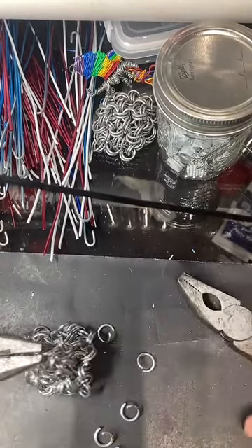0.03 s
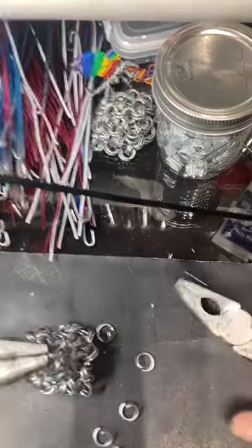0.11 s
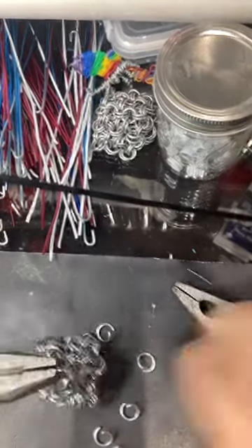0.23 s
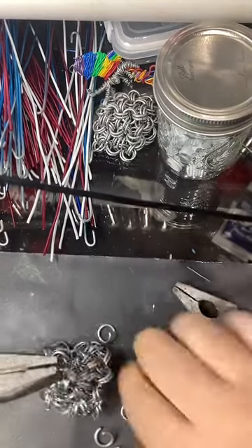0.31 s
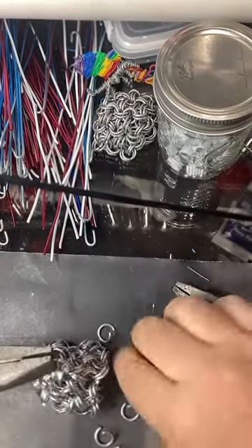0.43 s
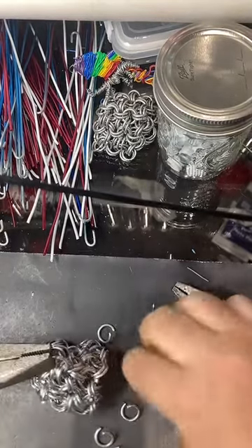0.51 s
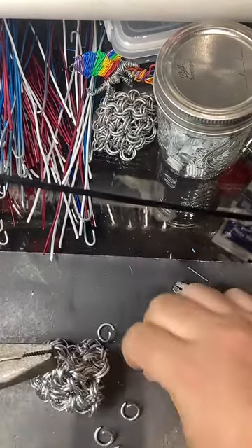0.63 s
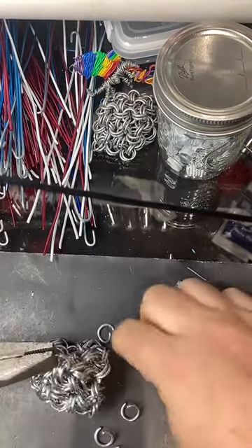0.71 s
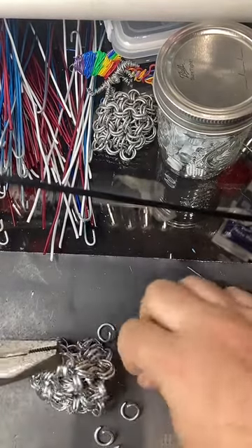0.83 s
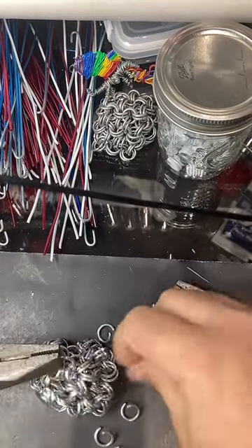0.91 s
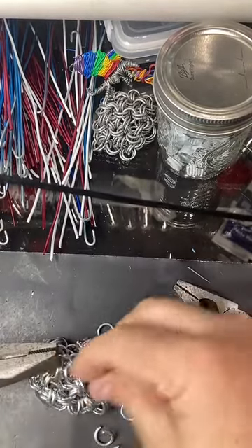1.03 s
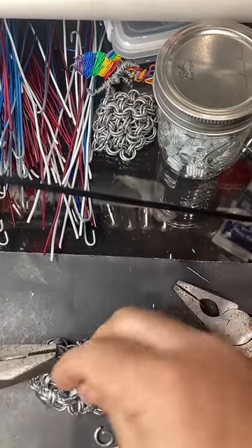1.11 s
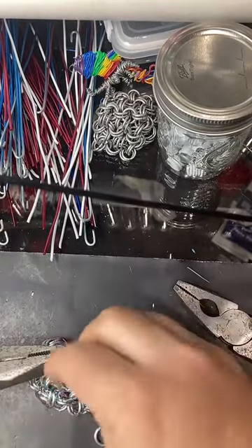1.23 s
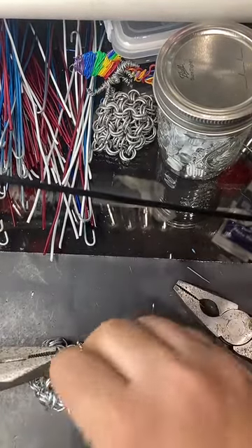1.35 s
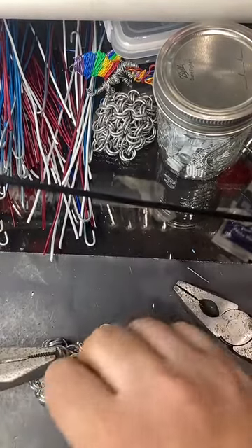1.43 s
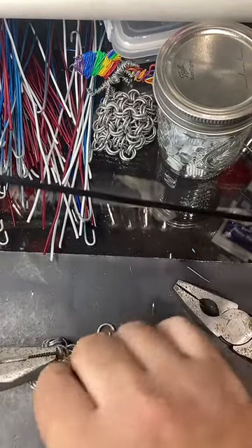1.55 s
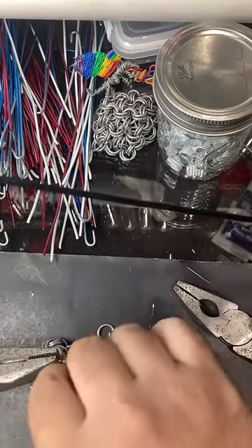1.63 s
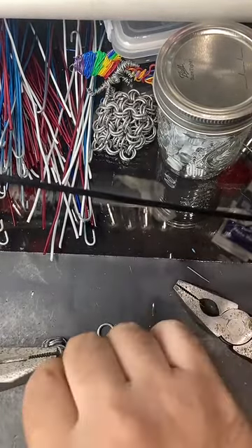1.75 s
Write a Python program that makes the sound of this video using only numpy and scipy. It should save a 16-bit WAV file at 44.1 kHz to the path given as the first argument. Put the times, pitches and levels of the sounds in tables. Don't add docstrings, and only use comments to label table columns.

```python
import sys
import numpy as np
from scipy import signal
from scipy.io import wavfile
from scipy.ndimage import uniform_filter1d

SR = 44100
rng = np.random.default_rng(int(sys.argv[2]) if len(sys.argv) > 2 else 0)


def amplitude_ratio(level_db):
    exponent = np.asarray(level_db, float) / 20
    return 10 ** exponent


def wav_out(sig):
    wavfile.write(sys.argv[1], SR, np.round(np.clip(np.atleast_2d(sig).T, -1, 1) * 32767).astype(np.int16))


N = 79380

# frequency in Hz, t60 in seconds.
ROOM_DECAY = [(60, 0.27), (250, 0.93), (1000, 0.6), (3000, 0.69), (8000, 0.49), (13000, 0.61)]


def evened(x):
    return x / np.sqrt(np.mean(x ** 2) + 1e-20)


def smoothed(x, size_0, size_1):
    return uniform_filter1d(uniform_filter1d(x, size=size_0, axis=0), size=size_1, axis=1)


def read(points, hz):
    f, value = np.transpose(points)
    return np.interp(np.log(hz + 1), np.log(f + 1), value)


def add(mix, s, sound):
    part = mix[round(s * SR):][:len(sound)]
    part += sound[:len(part)]


def colour(x, points):
    gain_db = np.maximum(read(points, abs(np.fft.fftfreq(8192, 1 / SR))), -100)
    log_gain = np.log(amplitude_ratio(gain_db))
    taps = np.fft.ifft(np.exp(np.conj(signal.hilbert(log_gain)))).real[:4096]
    return signal.oaconvolve(x, taps / np.linalg.norm(taps))[:len(x)]


def resonate(x, hz, width_hz):
    turn = np.exp(2j * np.pi * hz * np.arange(len(x)) / SR)
    r = np.exp(-np.pi * width_hz / SR)
    return 2 * (turn * signal.lfilter([1 - r], [1, -r], x / turn)).real


def tail(x, decays):
    hz, t, z = signal.stft(rng.standard_normal(SR), SR, nperseg=256)
    fall_db = -60 * t / read(decays, hz)[:, None]
    h = signal.istft(z * amplitude_ratio(fall_db), SR, nperseg=256)[1]
    h = h * np.minimum(np.arange(len(h)) / SR / 0.0013, 1)
    return signal.fftconvolve(x, h / np.linalg.norm(h))[:N]


def burst(noise, length_ms):
    u = np.arange(len(noise)) / SR * 1000 / length_ms
    return noise * np.minimum(4 * u, 1) * np.exp(-u)


def ring(modes, waver=0., waver_s=.03):
    t = np.arange(SR) / SR
    size = round(waver_s * SR)
    shake = rng.standard_normal((len(modes), SR))
    shake = uniform_filter1d(uniform_filter1d(shake, size=size, axis=1), size=size, axis=1)
    out = np.zeros(SR)
    for (hz, db, t60_s), w in zip(modes, shake):
        out += amplitude_ratio(db - 60 * t / t60_s) * (1 + waver * evened(w)) * np.sin(2 * np.pi * hz * t)
    return out


def knocks():
    # start in seconds, peak in dB, pitch in Hz, length in ms, bright share 0-1.
    contacts = [(0.237, -11.5, 2310, 5.6, 0.42), (0.2414, 5, 8640, 1.3, 0.3), (0.2417, -0.5, 650, 4.6, 0.1),
                (0.2429, -0.5, 294.2, 7, .05), (.2465, -3, 1090, 1.43, 0.2), (.2490, -3, 4700, 2.1, 0.4),
                (.2500, 1, 772, 2.3, 0.3), (0.252, -0.5, 1571, 1.1, 0), (0.256, -10.5, 2300, 0.78, 0.6),
                (0.2576, -6, 4800, 0.87, 0.4), (0.2599, -9.5, 1900, 1.1, 0.6),
                (0.2651, -2.5, 710, 0.83, 0.5), (0.271, -17, 2500, 0.97, 0.6),
                (0.2733, -14, 7900, 1.2, 0.6), (.2770, -4.5, 1720, 1.2, 0.4),
                (.289, -15.5, 9400, 0.67, 0.4), (0.3, -12, 2300, 1.1, 0.7), (0.3085, -16, 297, 4.3, 0.62),
                (0.309, -22, 8000, 0.71, .6), (0.344, -26, 5900, 1.9, 0.5)]
    # frequency in Hz, level in dB.
    dull_spectrum = [(200, -15.5), (600, -4), (1090, -3), (3240, -14.5), (4760, -20), (6390, -24),
                     (9180, -33.5), (12600, -49), (13500, -53)]
    bright_spectrum = [(300, -19.5), (2000, -0.5), (5000, 0), (8500, -2.5), (11000, -7.5), (13000, -8)]
    dull, bright, tone = np.zeros((3, N))
    noises = rng.standard_normal((len(contacts), 2, 1500))
    t = np.arange(1500) / SR
    for (s, db, hz, ms, share), noise in zip(contacts, noises):
        add(dull, s, 0.57 * amplitude_ratio(db) * (1 - share) * burst(noise[0], ms))
        add(bright, s, 0.71 * amplitude_ratio(db) * share * burst(noise[1], ms))
        pitched = np.sin(2 * np.pi * hz * t) * np.exp(-t * 1000 / ms)
        if hz > 2000:
            pitched = pitched * np.minimum(hz * t / 3, 1)
        add(tone, s, 0.26 * amplitude_ratio(db) * pitched / abs(pitched).max())
    return colour(dull, dull_spectrum) + colour(bright, bright_spectrum), amplitude_ratio(4) * tone


def table_and_steel():
    # frequency in Hz, level in dB, t60 in seconds.
    top_modes = [(173.3, -9.5, 0.71), (3112, -3, 0.13), (333.2, -9.5, 0.4), (520.6, -4, 0.32),
                 (483.5, -13.5, 0.29), (801, -3.5, .19), (1084, -2.5, 0.41), (1385, -4, 0.2),
                 (1580, 1, 0.24), (1805, 0, 0.33), (2300, -5, 0.22), (2867, 0, 0.15), (3500, -0.5, 0.25),
                 (4700, -3.5, 0.047)]
    steel_modes = [(258, -14, 2.5), (323, -3, 2.5), (366, -13, 2.5), (942, -14, 2.0), (1227, -11, 2.0),
                   (2089, -15, 2.0), (3230, -19, .8), (3580, -20, .8), (3725, -12, 1.8), (3765, -11, 1.8)]
    steady_top_modes = [(94.5, -13.5, .12), (651.3, -20.5, 0.6)]
    low_modes = [(76, -8, 0.23), (113.2, 0.5, 0.21), (169.7, -3.5, 0.25)]
    blow_s, rebound_s = 0.2417, 0.305
    top_db, steel_db, rebound_db = -24.5, -40, -17.5
    body = np.zeros(N)
    rise = np.minimum(np.arange(SR) / SR / 0.0064, 1)
    blow = amplitude_ratio(top_db) * ring(top_modes, waver=.8, waver_s=.012)
    blow += amplitude_ratio(steel_db) * ring(steel_modes, waver=.35, waver_s=.03)
    blow += ring(steady_top_modes)
    add(body, blow_s, rise * blow)
    add(body, rebound_s, rise * amplitude_ratio(rebound_db) * ring(low_modes))
    return body


def pliers():
    # frequency in Hz, t60 in seconds.
    rattle_decay = [(60, 0.58), (250, 0.2), (1000, 0.1), (3000, 0.12), (8000, 0.14), (13000, 0.13)]
    tone_to_room_db, rattle_db, room_db = -6, -3.5, -16
    noise, tone = knocks()
    highpass = signal.butter(2, 90, "high", fs=SR, output="sos")
    direct = signal.sosfilt(highpass, noise + tone)
    far = direct - (1 - amplitude_ratio(tone_to_room_db)) * tone
    far = colour(far, [(150, -4.5), (700, -5), (3000, 1.0), (9000, -4.5), (12000, -11)])
    scattered = amplitude_ratio(rattle_db) * tail(far, rattle_decay) + amplitude_ratio(room_db) * tail(far, ROOM_DECAY)
    return direct + table_and_steel() + scattered


def ticks():
    # start in seconds, peak in dB, pitch in Hz, length in ms.
    tips = [(0.0809, -30.5, 7550, 2.5), (0.0942, -36, 7800, 3.6), (0.111, -44, 6200, 2.2),
            (0.1185, -27.5, 4150, 0.89), (0.1303, -21, 5600, .7), (0.137, -45, 6400, 1.5),
            (.492, -45, 7000, 0.65), (0.5042, -38, 6500, 0.76), (0.5386, -37.5, 8680, 0.76),
            (0.547, -38.5, 5800, 1.8), (0.5545, -40, 6300, 1.6), (0.5644, -36, 6940, 0.83),
            (0.593, -52, 7600, 6.2), (.6240, -37.5, 7200, 1.8), (0.638, -47, 6500, 1.6),
            (0.7175, -32, 6700, 0.68), (0.729, -47, 6520, 2.8), (0.7505, -38, 6560, 0.56),
            (0.7598, -54, 7400, 2.9), (0.8845, -16.5, 6700, 0.3), (0.883, -32, 2480, 0.82),
            (0.8832, -31.5, 3280, 1.7), (.8841, -27, 9400, .3), (.8950, -36, 7670, 1.74),
            (1.3222, -42.5, 5708, 1.48), (1.5847, -44.5, 4020, 0.95), (1.6677, -50, 7460, .8),
            (1.674, -43, 5400, 0.58), (1.6771, -33, 5030, .8), (1.6744, -35, 8680, 0.52),
            (1.6766, -38.5, 5105, .8), (1.6784, -43, 11800, 0.64), (1.6880, -50.5, 6780, 2.0)]
    # frequency in Hz, level in dB.
    air_spectrum = [(800, -21.5), (2500, -3), (4500, -8), (6600, 3.5), (10500, -6.5), (13500, -12.5)]
    width_hz, tone_db = 420, 4
    wide, tone = np.zeros((2, N))
    for (s, db, hz, ms), noise in zip(tips, rng.standard_normal((len(tips), 1200))):
        u = np.arange(1200) / SR * 1000 / ms
        hit = amplitude_ratio(db) * 0.71 * np.clip(noise, -2, 2) * u * np.exp(-u)
        add(wide, s, hit)
        add(tone, s, 3 * resonate(resonate(hit, hz, width_hz), hz, 2 * width_hz))
    return colour(wide, air_spectrum) + amplitude_ratio(tone_db) * tone


def slips():
    # frequency in Hz, level in dB.
    scrape_spectrum = [(240, 0.5), (400, 6), (2240, -6.5), (2670, -7.5), (2880, -6), (7170, -8),
                       (10800, -10.5), (12500, -9), (13500, -5.5)]
    slips_per_s, spread_db, decay_cycles = 21000, 2.5, 3.2
    size = amplitude_ratio(spread_db * np.minimum(rng.exponential(1, N), 4)) * (rng.random(N) < slips_per_s / SR)
    which = rng.integers(0, 30, N)
    t = np.arange(300) / SR
    out = np.zeros(N)
    for k, hz in enumerate(np.geomspace(1500, 13000, num=30)):
        grain = hz * np.exp(-t * hz / decay_cycles) * np.sin(2 * np.pi * hz * t)
        out += signal.oaconvolve(size * (which == k), grain)[:N]
    return evened(colour(out, scrape_spectrum))


def slide():
    # start in seconds, length in seconds, level in dB, pitch in Hz.
    strokes = [(-.03, .12, -41, 6500), (-.03, 0.13, -60, 12200), (-.03, 0.095, -56.5, 1110),
               (0.063, 0.094, -48, 7700), (0.109, 0.084, -43, 5400), (0.142, 0.36, -52.5, 7760),
               (.33, 0.13, -59, 3600), (0.371, 0.2, -54, 8500), (0.518, 0.1, -57, 7470),
               (0.609, 0.034, -83, 7380), (0.617, 0.044, -56.5, 8340), (0.664, 0.056, -60, 6900),
               (0.728, 0.077, -62.5, 7440), (0.823, 0.14, -53.5, 8810), (.84, .06, -60, 11000),
               (0.878, 0.15, -59.5, 7160), (0.986, 0.15, -55, 6790), (1.024, 0.063, -58, 3170),
               (1.072, 0.08, -62.5, 5000), (1.2, 0.11, -70, 8400), (1.338, 0.071, -68, 10000),
               (1.092, 0.023, -66, 6100), (1.426, 0.12, -66.5, 4870), (1.57, 0.061, -66, 8990),
               (1.689, 0.049, -67.5, 5860)]
    tone_width_hz, tone_db = 380, -14
    grit = slips()
    t = np.arange(N) / SR
    out = np.zeros(N)
    for s, length_s, db, hz in strokes:
        push = np.sin(np.pi * np.clip((t - s) / length_s, 0, 1) ** 0.54) ** 2
        broad = evened(resonate(grit, hz, 0.71 * hz))
        narrow = evened(resonate(grit, hz, tone_width_hz))
        out += amplitude_ratio(db) * push * (broad + amplitude_ratio(tone_db) * narrow)
    return out


def thuds():
    # start in seconds, peak in dB, pitch in Hz, t60 in seconds.
    taps = [
        (0.18, -25, 277, 0.019),
        (0.189, -37.5, 138, 0.14),
        (.395, -34, 112, 0.77),
        (0.672, -45, 64, 0.5),
        (0.757, -39, 104.7, 0.21),
        (1.36, -54, 111.2, .08),
        (1.469, -49.5, 206, 0.16),
        (1.479, -53, 402.4, 0.22),
    ]
    out = np.zeros(N)
    t = np.arange(SR // 4) / SR
    for (s, db, hz, t60_s), noise in zip(taps, rng.standard_normal((len(taps), SR // 4))):
        fuzz = evened(resonate(resonate(noise, hz, hz), hz, hz))
        tone = np.sin(2 * np.pi * hz * t) + .5 * fuzz
        add(out, s, amplitude_ratio(db - 60 * t / t60_s) * np.minimum(t * hz, 1) * tone)
    return out


def hum():
    # frequency in Hz, level in dB.
    air_spectrum = [(15, -11), (25, -34), (64, 2), (86, -9.5), (205, -8), (544, -18.5), (1110, -22),
                    (9840, -37), (13500, -59.5)]
    # frequency in Hz, width in Hz, level in dB.
    peaks = [(60, 21, -3), (112, 3.6, 1), (205, 14, -7.5), (282, 29, -11.5), (303.8, 17, -8.5),
             (370.3, 2.9, -11.5), (438, 6.5, -11), (933, 52, -10.5), (1221, 17, -12)]
    # time in seconds, level in dB.
    drift = [(0, 1), (.15, 1), (.3, 7.5), (.7, 2), (1.1, 3), (1.501, 1.5), (1.621, -2.5), (1.8, -3.5)]
    hum_db, peak_db, patch_db = -56.5, -2.5, 1.5
    white = rng.standard_normal((2, N + 8192))
    z = signal.stft(white[0], nperseg=512)[2]
    patches = evened(smoothed(rng.standard_normal(z.shape), 12, 8))
    air = signal.istft(z * amplitude_ratio(patch_db * patches), nperseg=512)[1][:N + 8192]
    air = evened(colour(air, air_spectrum))
    lines = evened(sum(amplitude_ratio(db) * evened(resonate(white[1], hz, width_hz)) for hz, width_hz, db in peaks))
    s, db = np.transpose(drift)
    level = amplitude_ratio(hum_db + np.interp(np.arange(N) / SR, s, db))
    return level * (air + amplitude_ratio(peak_db) * lines)[-N:]


def side_treble(mid):
    # from in seconds, to in seconds.
    alike = [
        (.088, .135),
        (.217, .325),
        (.553, .577),
        (.705, .742),
        (.872, .925),
        (1.657, 1.678),
    ]
    side_db, tilt_db, fade_s, gap_share = -4.5, 3, .006, .9
    t = np.arange(N) / SR
    apart = np.prod([np.clip(np.maximum(a - t, t - b) / fade_s, 0, 1) for a, b in alike], axis=0)
    hz, _, z = signal.stft(mid * apart, SR, nperseg=512)
    gain_db = read([(3600, -tilt_db), (12000, tilt_db)], hz) - 200 * (hz < 4300)
    patches = evened(smoothed(rng.standard_normal(z.shape), 14, 8))
    z = abs(z) * amplitude_ratio(gain_db)[:, None] * np.exp(2j * np.pi * rng.random(z.shape))
    z = z * (patches < gap_share + (hz[:, None] - 6000) / 3000)
    return amplitude_ratio(side_db) * apart * signal.istft(z, SR, nperseg=512)[1][:N]


def scene():
    ring_room_db = -16
    rings = ticks() + slide()
    mid = pliers() + rings + amplitude_ratio(ring_room_db) * tail(rings, ROOM_DECAY) + thuds() + hum()
    side = side_treble(mid)
    return mid + np.array([side, -side])


def top_cut(x):
    return signal.sosfilt(signal.butter(12, 14140, fs=SR, output="sos"), x)


def record(dry):
    mid = dry.mean(0)
    x = dry - mid + np.tanh(mid * 1.02) / 1.02
    lowpass = signal.firwin(255, 13120, window=("kaiser", 7), fs=SR)
    x = signal.oaconvolve(x, lowpass[None], "same")
    return top_cut(x)


dry = scene()
out = record(dry)
wav_out(out)
```